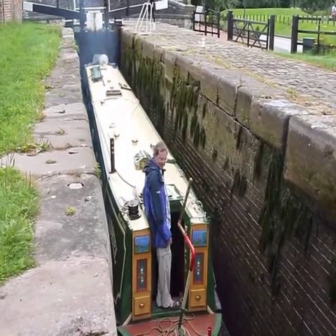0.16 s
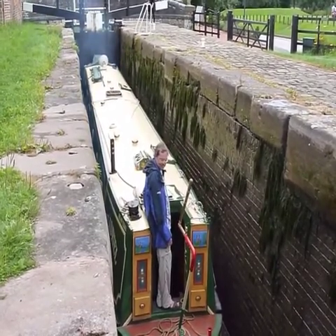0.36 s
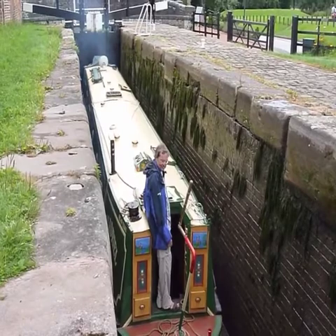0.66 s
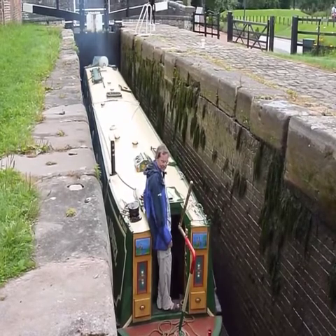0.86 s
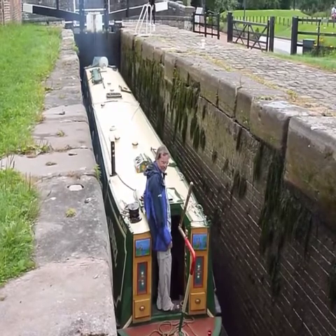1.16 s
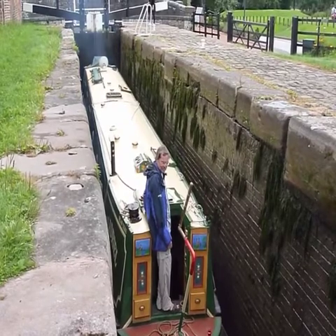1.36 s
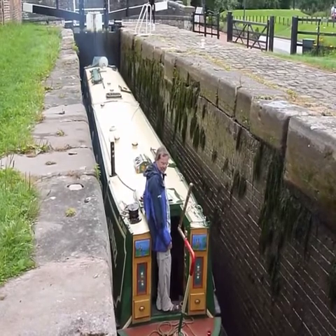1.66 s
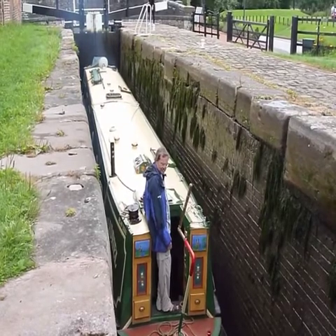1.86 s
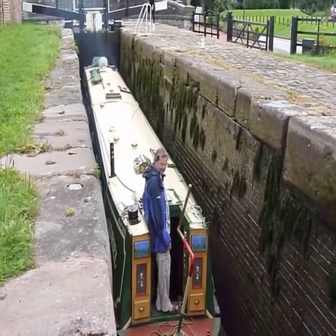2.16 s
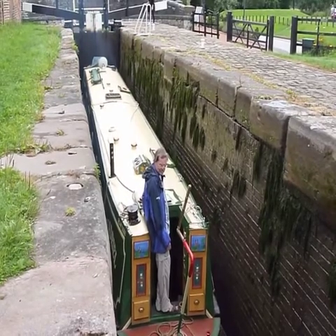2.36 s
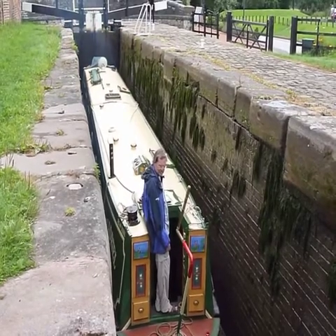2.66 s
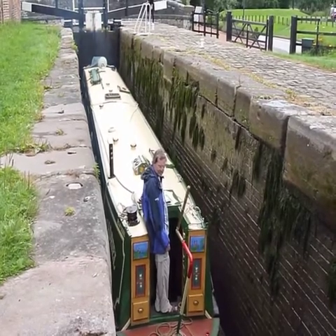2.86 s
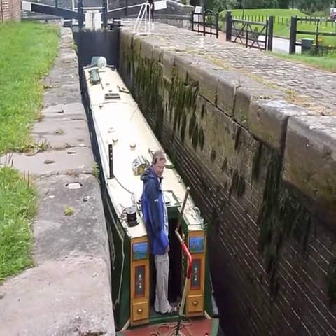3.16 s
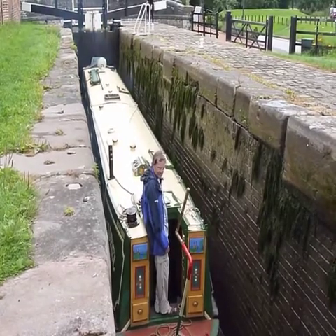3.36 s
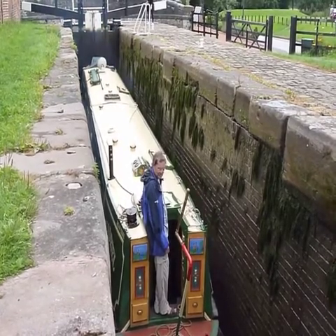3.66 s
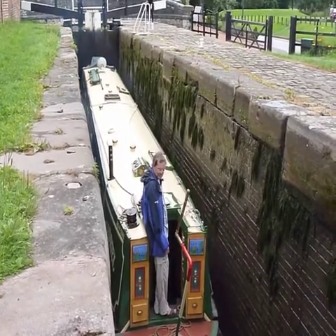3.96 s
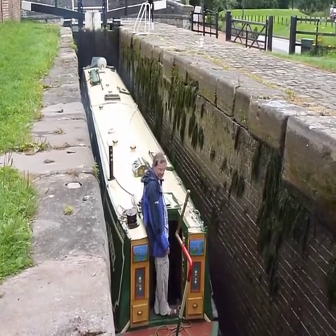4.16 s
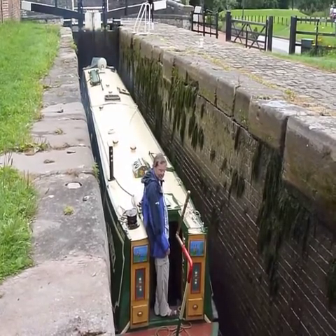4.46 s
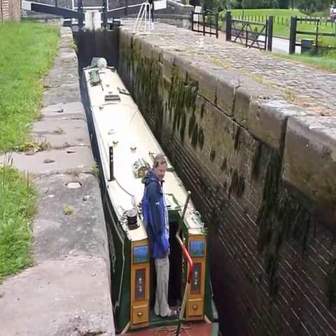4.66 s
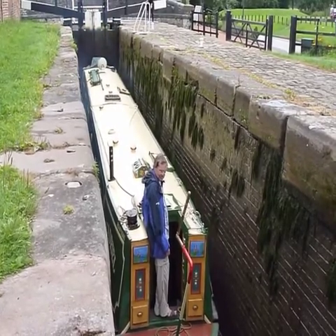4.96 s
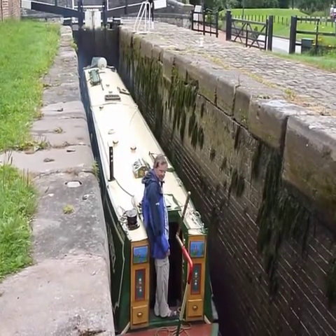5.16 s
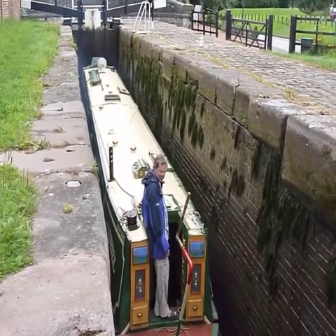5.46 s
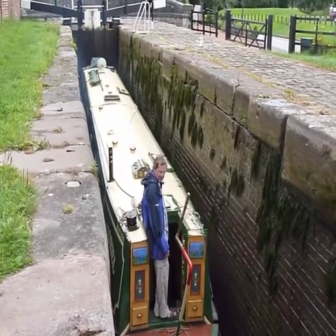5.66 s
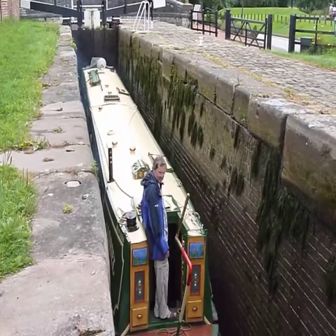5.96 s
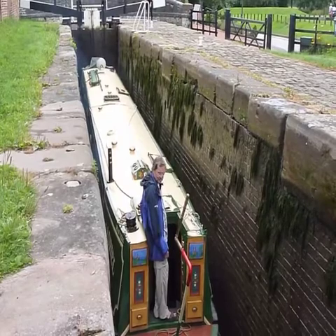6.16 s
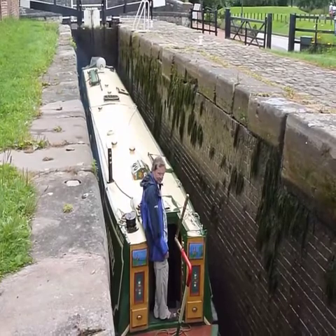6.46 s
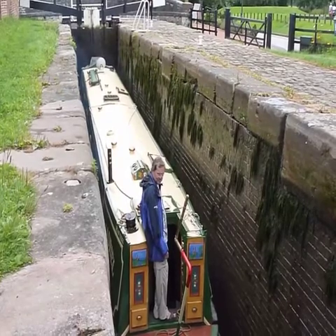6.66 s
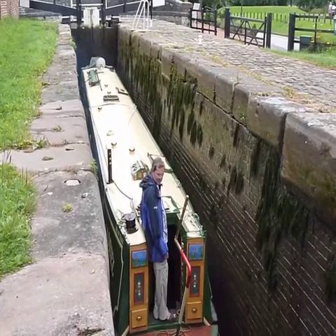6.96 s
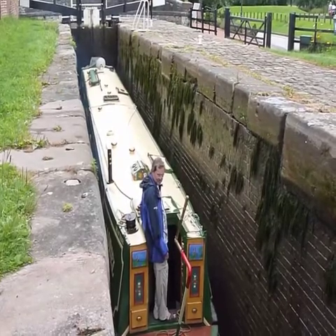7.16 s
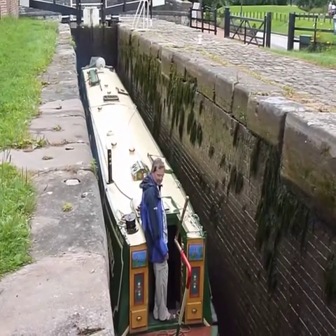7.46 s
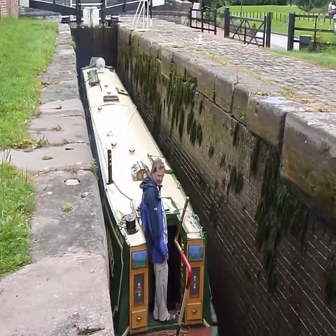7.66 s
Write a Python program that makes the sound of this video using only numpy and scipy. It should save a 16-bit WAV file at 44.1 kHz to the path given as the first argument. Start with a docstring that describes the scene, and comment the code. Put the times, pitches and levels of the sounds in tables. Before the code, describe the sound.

Close stereo outdoor sound beside a deep, narrow lock chamber. Turbulent water dominates throughout, restless but steady, with bubbling and spatter on top and short reflections from wet stone. Beneath it a low diesel chugs at idle, its rhythm repeating about three times a second. Irregular plops and drips stand out, the strongest around the middle, with occasional soft, low gulps. The treble is slightly dulled.

```python
"""Canal lock, heard from the lock side: water pours through the sluices into the stone chamber.
Turbulent churn and hiss are shaped noise; gurgle, spatter and crackle are sums of ringing bubbles.
A boat's slow diesel idles below: one repeated round of thumps rings exhaust, hull and chamber.
Splashes are showers of tiny bubbles; close drops smack, ring hollow and echo off the stone.
Now and then trapped air hoots in the culvert."""
import sys
import numpy as np
from scipy import signal
from scipy.fft import irfft
from scipy.io import wavfile
from scipy.ndimage import uniform_filter1d

SR = 44100
rng = np.random.default_rng(int(sys.argv[2]) if len(sys.argv) > 2 else 0)


def inscribe(sig):
    """Save sig as 16-bit PCM at rate SR to the path in sys.argv[1].

    A 1-D sig is mono; a 2-D sig holds one channel per row.
    Samples are clipped to [-1, 1] before scaling.
    """
    pcm = np.round(np.clip(np.atleast_2d(sig).T, -1, 1) * 32767)
    wavfile.write(sys.argv[1], SR, pcm.astype(np.int16))


N = 343539


def gain_of(db):
    """Decibels to amplitude."""
    return 10 ** (np.asarray(db) / 20)


def evened(x):
    """Scales to rms 1."""
    return x / np.sqrt(np.mean(x ** 2) + 1e-20)


def read(points, hz):
    """Interpolates a spectrum table on a log-frequency axis."""
    f, value = np.transpose(points)
    return np.interp(np.log(hz + 1), np.log(f + 1), value)


def add(mix, start_s, sound):
    """Mixes a sound in at its start time."""
    part = mix[..., max(round(start_s * SR), 0):][..., :sound.shape[-1]]
    part += sound[..., :part.shape[-1]]


def drift(t, slow_hz, fast_hz):
    """Random wander of rms 1: sines of random phase between two rates, the slow ones strongest."""
    rates_hz = np.geomspace(slow_hz, fast_hz, 20)
    return evened(sum(np.sin(2 * np.pi * (f * t + rng.random())) / np.sqrt(f) for f in rates_hz))


def chamber(x, t60_s):
    """Dense reflections between stone walls: convolution with exponentially dying noise."""
    t = np.arange(SR // 2) / SR
    tail = rng.standard_normal(len(t)) * gain_of(-60 * t / t60_s)
    return signal.fftconvolve(x, tail / np.linalg.norm(tail))[:N]


def resonance(hz, centre_hz, width_hz):
    """Complex response of one resonance, gain 1 at its centre."""
    return 1 / (1 + 1j * (hz / centre_hz - centre_hz / hz) * centre_hz / width_hz)


# Brief rises and dips in the loudness of churn and spray.
# Each row: middle in seconds, length in seconds, churn change in dB, spray change in dB.
LOUDNESS_BENDS = [(0.208, .16, 1, 1.5), (0.369, .1, -1.5, -1), (0.748, .2, -1, 1.5), (1.35, .2, 1.5, 0),
                  (1.91, .1, -1, -1.8), (2.313, .12, 2.5, 1.2), (2.384, .07, -2.5, -1), (2.72, 0.23, .8, 1),
                  (2.93, .14, 2, -0.5), (3.96, .08, -1.5, -2.5), (4.17, 0.4, -2.2, -0.8),
                  (4.708, .08, -2.5, 0.5), (4.85, .16, 1.5, 1.3), (5.83, .1, -2.5, -2),
                  (6.22, 0.44, 3, -0.1), (7.591, .1, 3, 0)]


def loudness_db(t, restless_db):
    """Levels of churn and spray: each wanders by itself; brief rises and dips add smooth arches."""
    level_db = restless_db * np.array([drift(t, 0.698, 8), drift(t, 0.679, 8)])
    for middle_s, length_s, churn_db, spray_db in LOUDNESS_BENDS:
        arch = np.cos(np.pi * np.clip((t - middle_s) / length_s, -.5, .5)) ** 2
        level_db += np.outer([churn_db, spray_db], arch)
    return level_db[:, :, None]


# Spectrum of the rushing water. Each row: frequency in Hz, relative level in dB.
RUSH_SPECTRUM = [(20, -39), (45, -19), (85, -3.5), (150, -0.5), (190, 1), (245, 3.5), (305, -1), (370, 1.4),
                 (460, -1.5), (590, -1.4), (750, -3.5), (1100, -4.5), (1900, -7), (2300, -8), (3700, -10),
                 (5000, -7.5), (7200, -14)]
# Likeness of the two microphone ports. Each row: frequency in Hz, likeness from 0 to 1.
PORT_LIKENESS = [(200, 1), (900, 1), (1600, 1), (2300, 0.9), (3200, 0.52), (3900, 0.3), (4400, 0.44),
                 (7500, 0.79)]
# Level difference of the ports. Each row: frequency in Hz, left over right in dB.
PORT_LEAN = [(900, 0), (1600, -2.5), (2300, -2.5), (3400, -8), (4600, -4), (5600, -7), (7000, -1)]
# Phase difference of the ports. Each row: frequency in Hz, lead of the left in radians.
PORT_LEAD = [(2600, 0), (3600, -.4), (4200, -0.49), (5300, -1), (6700, 0.059), (7300, -0.91)]
RUSH_RMS_DB = -23.5


def rush(churn_patch_db=1.67, spray_patch_db=1.17, churn_flicker_db=0.8, spray_flicker_db=0.54):
    """Turbulent water: noise with lumpy churn below and smoother spray above, both uneven in level."""
    size, hop = 1024, 256
    frames, hz = N // hop + 5, np.fft.rfftfreq(size, 1 / SR)
    t = np.arange(frames) * hop / SR
    a, b, c, d, patches = rng.standard_normal((5, frames, len(hz)))

    # lumps: noise smoothed over frames, then over frequency
    patches = uniform_filter1d(patches, size=10, axis=0)
    patches = evened(uniform_filter1d(patches, size=16, axis=1))
    churn_level, spray_level = loudness_db(t, restless_db=0.44)
    churn_db = churn_patch_db * patches + churn_level + churn_flicker_db * drift(t, 6, 45)[:, None]
    spray_db = spray_patch_db * patches + spray_level + spray_flicker_db * drift(t, 6, 45)[:, None]
    spray_share = read([(1500, 0.11), (3500, 1)], hz)
    field_db = read(RUSH_SPECTRUM, hz) + (1 - spray_share) * churn_db + spray_share * spray_db

    same = np.clip(read(PORT_LIKENESS, hz), -1, 1)
    left = a + 1j * b
    right = same * left + np.sqrt(1 - same ** 2) * (c + 1j * d)
    right = right * np.exp(-1j * read(PORT_LEAD, hz))
    lean = gain_of(read(PORT_LEAN, hz) / 2)
    stereo = np.array([left * lean, right / lean]) * gain_of(field_db)
    sound = signal.istft(stereo.swapaxes(1, 2), nperseg=size, noverlap=size - hop)[1][:, :N]
    return gain_of(RUSH_RMS_DB) * evened(sound)


# Thumps within one engine cycle.
# Each row: time into the cycle in seconds, relative level in dB, strongest frequency in Hz, width in Hz.
ENGINE_THUMPS = [(.0083, -4.3, 136, 12), (.0361, -2.4, 129, 12), (.0471, -5.3, 80, 50),
                 (.0918, -17.2, 190, 64), (.1519, -2.6, 78, 20), (.2049, -9.1, 92, 53),
                 (.241, -24, 190, 12), (.2492, 2.2, 114, 12), (.2622, -2.6, 82, 30),
                 (.2708, -17.5, 216, 47), (.3111, 1.5, 81, 12)]
# Resonances of exhaust, hull and chamber.
# Each row: frequency in Hz, width in Hz, level over the direct sound in dB.
ENGINE_RESONANCES = [(56.5, 4.2, 10.7), (94.3, 6.9, 19.3), (123.7, 6.7, 20.2), (188.2, 21, 24)]
# The governor hunts slowly around the beat. Each row: time in seconds, lag in seconds.
GOVERNOR_LAG = [(0, .0018), (1.1, -.0014), (2.1, -.0008), (2.9, .0014), (3.9, -.0002), (5.3, .0009),
                (6.8, -.0012), (7.7, .0002)]
CYCLE_HZ, ENGINE_DB = 3.1536, -28.15


def engine():
    """Diesel at idle: one round of thumps rings the resonances every cycle; the governor hunts a little."""
    size, uneven_db = 8192, .25
    hz = np.arange(1, size // 2) * CYCLE_HZ
    blows = sum(gain_of(db) * resonance(hz, f, width) * np.exp(-2j * np.pi * hz * s)
                for s, db, f, width in ENGINE_THUMPS)
    body = 1 + sum(gain_of(db) * resonance(hz, f, width) for f, width, db in ENGINE_RESONANCES)
    cycle = irfft(np.r_[0, blows * body], size)
    t = np.arange(N) / SR
    turns = (t - np.interp(t, *np.transpose(GOVERNOR_LAG))) * CYCLE_HZ
    sound = np.interp(turns, np.arange(size) / size, cycle, period=1)
    return gain_of(ENGINE_DB + uneven_db * drift(t, 0.97, 14)) * evened(sound)


def bubbles(rms_db, low_hz, high_hz, base_per_s, decay_cycles, spread_db, wet, clump_db, sizes=30):
    """Bubbles of many sizes, born in spurts, ring a few cycles, rising in pitch as they near the surface."""
    out = np.zeros((2, N))
    spurts = gain_of(clump_db * drift(np.arange(N) / SR, 5, 50))
    for hz in np.geomspace(low_hz, high_hz, sizes):
        turns = np.arange(int(4 * decay_cycles * SR / hz)) * hz / SR
        age = turns / decay_cycles
        ring = np.sin(2 * np.pi * turns * (1 + 0.016 * age)) * np.exp(-age) * (1 - np.exp(-turns))
        births = np.flatnonzero(rng.random(N) < base_per_s * spurts / sizes / SR)
        train = np.zeros(N)
        train[births] = gain_of(spread_db * np.minimum(rng.exponential(1, len(births)), 4))
        lean = gain_of(read(PORT_LEAN, hz) * np.array([[.5], [-.5]]))
        out += lean * signal.oaconvolve(train, ring)[:N]
    return gain_of(rms_db) * evened(out + wet * chamber(out.mean(0), t60_s=0.18))


# Near drops. Each row: start in seconds, relative level in dB, pitch in Hz, bright overtone in dB.
NEAR_DROPS = [(.0093, -15.5, 1680, 5), (.0408, -15, 1880, 4), (.2108, -13, 1900, -2), (.2543, -19, 2050, 6),
              (.5907, -19.5, 2350, 6), (.6943, -14.5, 1790, -5), (.7218, -12.3, 1850, -7),
              (.7633, -9, 1950, -13), (1.0047, -16, 1850, -3), (1.2497, -15, 2080, -3),
              (2.0622, -15, 1830, -12), (2.3576, -15.5, 1850, -6), (2.8026, -16, 1950, -12),
              (2.8933, -12.2, 1780, -2), (3.0713, -18.5, 2350, 6), (3.2242, -11, 1940, -8),
              (3.4594, -6.4, 1760, -9), (4.1253, -6.3, 1880, -11), (4.4416, -13.8, 1790, -6),
              (4.5441, -16, 3050, -15), (4.6502, -20.5, 2100, 6), (4.8576, -14, 1810, -6),
              (5.0861, -6.7, 1770, -8), (5.5879, -20.5, 2100, 6), (6.3178, -20.5, 2200, 6),
              (6.5039, -19.5, 2100, 6), (6.5969, -14, 1920, 0), (6.8028, -16.5, 1810, 6),
              (7.0056, -19.5, 1850, 6), (7.0145, -18.5, 1880, 6), (7.211, -19.5, 2000, 6),
              (7.2905, -20.5, 2100, 6), (7.7493, -10.6, 1880, -4)]
# Modes of a smack besides the bright overtone. Each row: multiple of the pitch, level in dB.
SMACK_MODES = [(.68, -12), (1, 0), (2, -20)]
# Echoes off the near and the far wall. Each row: delay in seconds, level in dB.
WALL_ECHOES = [(.0043, -15), (.0117, -10.5)]
RIGHT_OVER_LEFT_DB = 4
DROPLETS, DROPLET_DB, DROPLET_HZ = 8, -21.5, (1550, 1950)  # fainter drops at random times
HOLLOW_DB, HOLLOW_T60_S = -14, .05


def drops(trim_db=-3.0, length_s=0.003, overtone=1.496, droplet_overtone_db=-3, crack_db=-23, wet_db=-9.5):
    """A drop cracks and smacks, its air pocket rings on at its pitch, and the walls throw the smack back."""
    out = np.zeros((2, N))
    loudest_db = max(row[1] for row in NEAR_DROPS)
    crack_band = signal.butter(2, [1500, 4200], "bandpass", fs=SR, output="sos")
    droplets = [(when * N / SR, DROPLET_DB, np.interp(pitch, [0, 1], DROPLET_HZ), droplet_overtone_db)
                for when, pitch in rng.random(size=(DROPLETS, 2))]
    for start_s, db, hz, overtone_db in list(NEAR_DROPS) + droplets:
        heft = np.sqrt(gain_of((db - loudest_db) / 2))  # small drops ring shorter and fainter
        t = np.arange(int(length_s * heft * SR)) / SR
        modes = list(SMACK_MODES) + [(overtone, overtone_db)]
        ring = sum(gain_of(mode_db) * np.sin(2 * np.pi * ratio * hz * t) for ratio, mode_db in modes)
        noise = signal.sosfilt(crack_band, rng.standard_normal(SR // 20))[:len(t)]
        crack = gain_of(crack_db) * evened(noise)
        sides = gain_of(trim_db + db + RIGHT_OVER_LEFT_DB * np.array([[-.5], [.5]]))
        smack = (heft * ring + crack) * signal.windows.tukey(len(t), .4) * sides
        add(out, start_s, smack)

        after = np.arange(SR // 20) / SR
        fade = gain_of(trim_db + db + HOLLOW_DB - 60 * after / HOLLOW_T60_S)
        add(out, start_s + len(t) / SR, heft * fade * np.sin(2 * np.pi * hz * after))
        for delay_s, echo_db in WALL_ECHOES:
            add(out, start_s + delay_s, gain_of(echo_db) * smack)
    return out + gain_of(wet_db) * chamber(out.mean(0), t60_s=0.17)


# Water slapping the walls.
# Each row: middle in seconds, length in seconds, dry level in dB, middle bubble pitch in Hz.
WALL_SPLASHES = [(.032, .04, -37, 1050), (.172, .08, -38, 2800), (.222, .05, -35, 1350),
                 (0.331, .04, -38, 1550), (.465, .04, -35, 1050), (.72, .02, -35, 1950),
                 (1.635, .06, -38, 3600), (2.085, .08, -37, 1800), (2.309, .05, -34, 1400),
                 (2.446, .05, -34.5, 1300), (2.665, .06, -36, 2500), (2.722, .07, -36, 3500),
                 (2.79, .06, -35, 1200), (3.068, .025, -38, 3200), (5.56, .06, -35, 750),
                 (6.318, .06, -39, 2700), (6.53, .08, -39.5, 3400)]


def splashes(decay_cycles=1.8, spread_db=2.0, octaves=.4, wet=0.46, count=90):
    """Each slap breaks into a shower of tiny ringing bubbles, thickest at its middle."""
    out = np.zeros((2, N))
    t = np.arange(SR // 50) / SR
    for middle_s, length_s, db, hz in WALL_SPLASHES:
        shower = np.zeros(int(length_s * SR) + len(t))
        for early, late, pitch, size in rng.random((count, 4)):
            turns = t * hz * 2 ** (octaves * (2 * pitch - 1))
            ring = np.sin(2 * np.pi * turns) * np.exp(-turns / decay_cycles) * (1 - np.exp(-turns))
            loudness = gain_of(-spread_db * np.log(1 - size))
            add(shower, length_s * (early + late) / 2, loudness * ring)
        sides = gain_of(db + read(PORT_LEAN, hz) * np.array([[.5], [-.5]]))
        add(out, middle_s - length_s / 2, sides * evened(shower))
    return out + wet * chamber(out.mean(0), t60_s=0.16)


# Hollow gulps in the culvert. Each row: start in seconds, peak in dB, pitch in Hz, length in seconds.
CULVERT_GULPS = [(0.396, -28, 247, 0.24), (0.561, -27, 397, .08), (4.68, -30, 268, .16),
                 (4.831, -25.5, 264.5, 0.24), (5.919, -28, 265, .1), (6.16, -27, 268, .12),
                 (7.53, -27, 412, 0.11)]


def gulps(waver=0.015):
    """Trapped air in the culvert swells into a brief hoot of wavering pitch."""
    out = np.zeros(N)
    for start_s, db, hz, length_s in CULVERT_GULPS:
        t = np.arange(int(length_s * SR)) / SR
        turns = np.cumsum(hz * (1 + waver * drift(t, 5.7, 40))) / SR
        add(out, start_s, gain_of(db) * np.hanning(len(t)) * np.sin(2 * np.pi * turns))
    return out


def scene():
    """Rush, bubbles, drops, splashes and gulps over the idling engine."""
    gurgle = bubbles(rms_db=-32.5, low_hz=397.5, high_hz=1602, base_per_s=450, decay_cycles=3.2,
                     spread_db=3.0, wet=0.39, clump_db=3)
    spatter = bubbles(rms_db=-34.6, low_hz=1000, high_hz=4530, base_per_s=700, decay_cycles=2.0,
                      spread_db=3.0, wet=.4, clump_db=3.5)
    crackle = bubbles(rms_db=-41.5, low_hz=2800, high_hz=6500, base_per_s=200, decay_cycles=1.3,
                      spread_db=4, wet=.2, clump_db=4.5, sizes=12)
    water = rush() + gurgle + spatter + crackle
    return water + engine() + drops() + splashes() + gulps()


def record(dry):
    """A steep linear-phase low-pass keeps only the band below its cut-off."""
    cutoff_hz = 7750
    low_pass = signal.firwin(121, cutoff_hz, window=("kaiser", 8), fs=SR)
    return signal.oaconvolve(dry, low_pass[None], "same")


dry = scene()
out = record(dry)
inscribe(out)
```